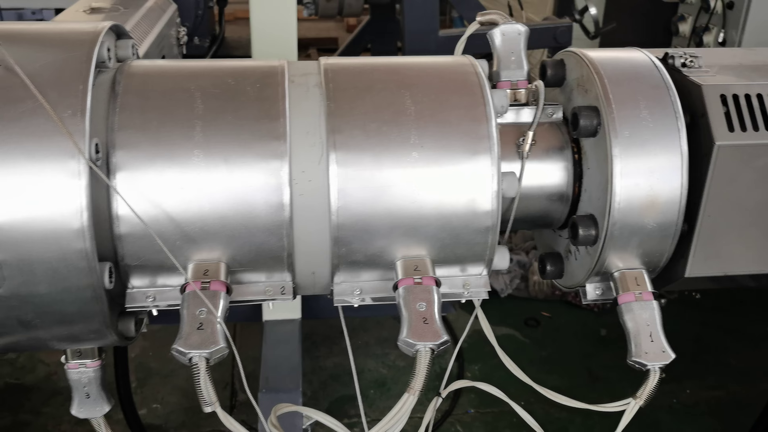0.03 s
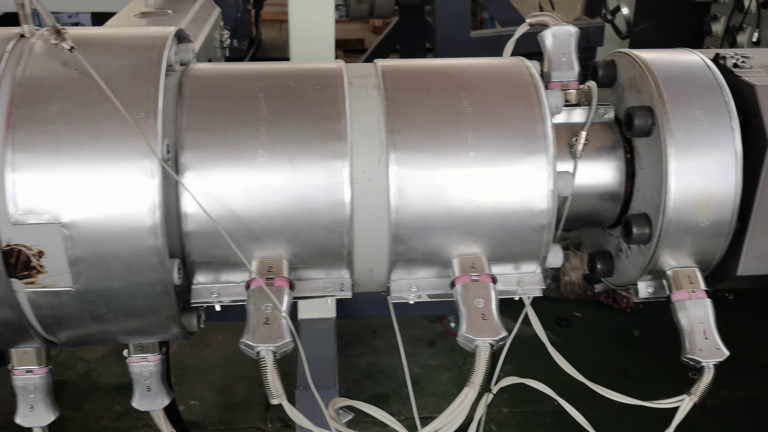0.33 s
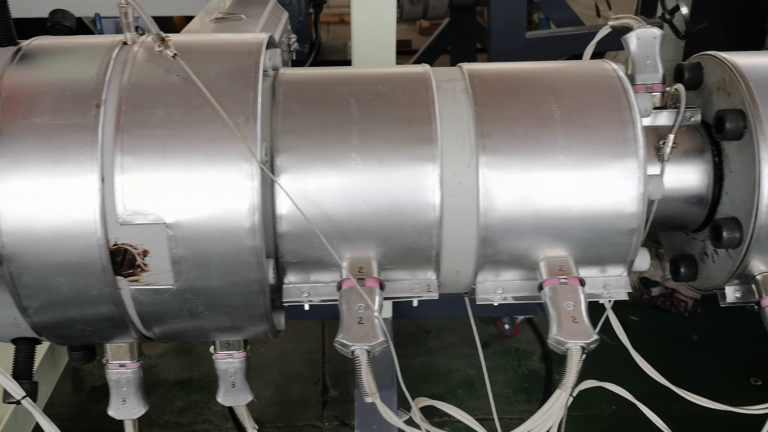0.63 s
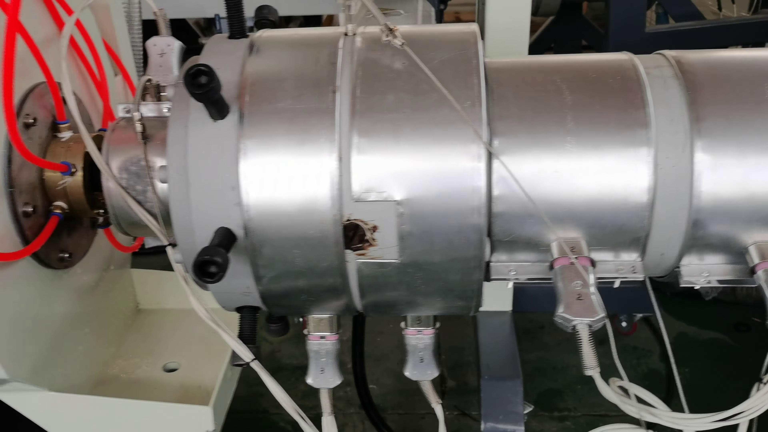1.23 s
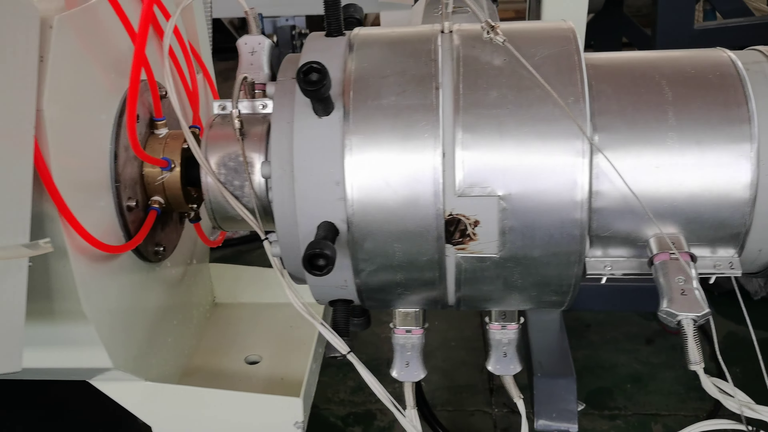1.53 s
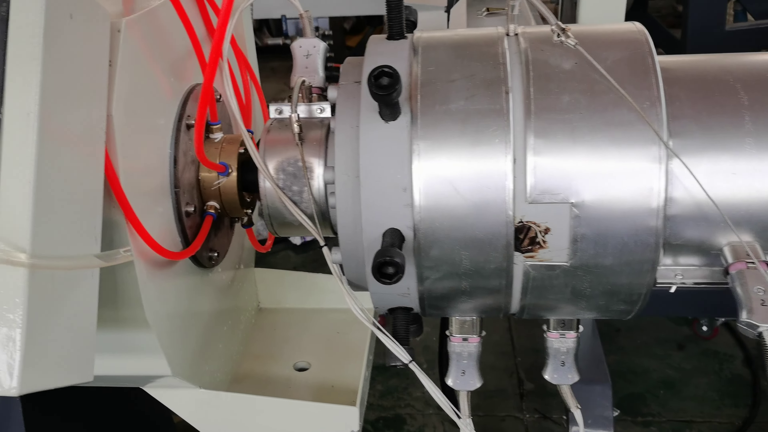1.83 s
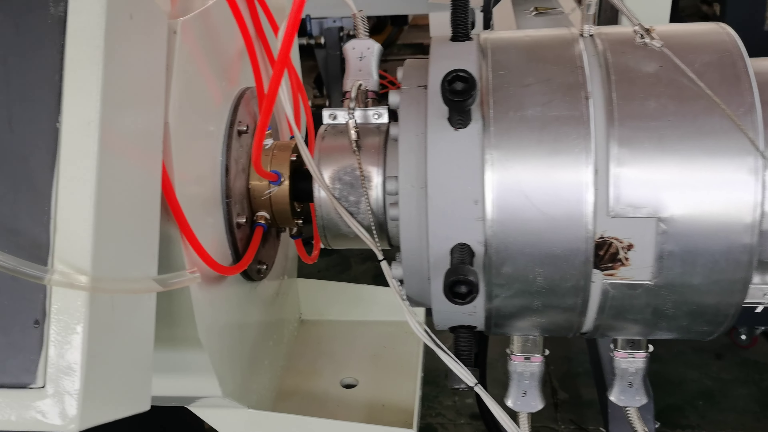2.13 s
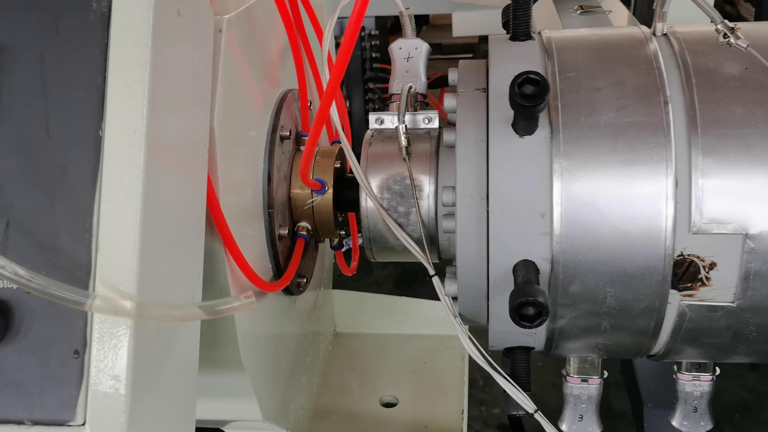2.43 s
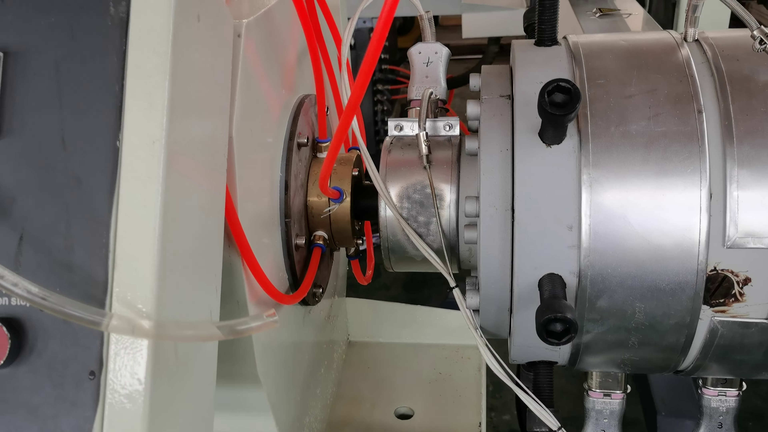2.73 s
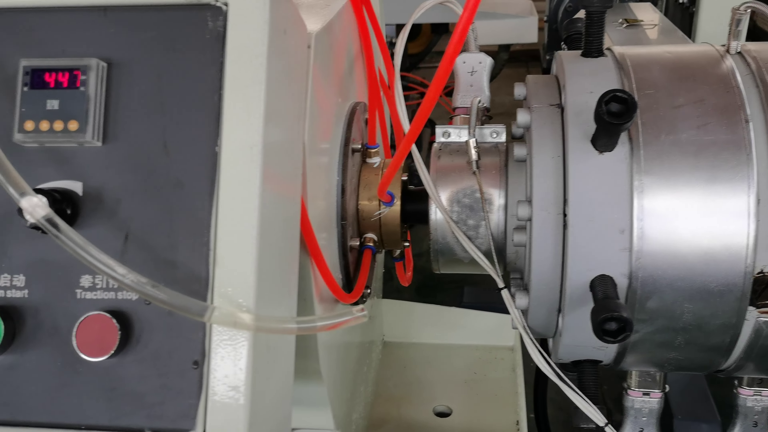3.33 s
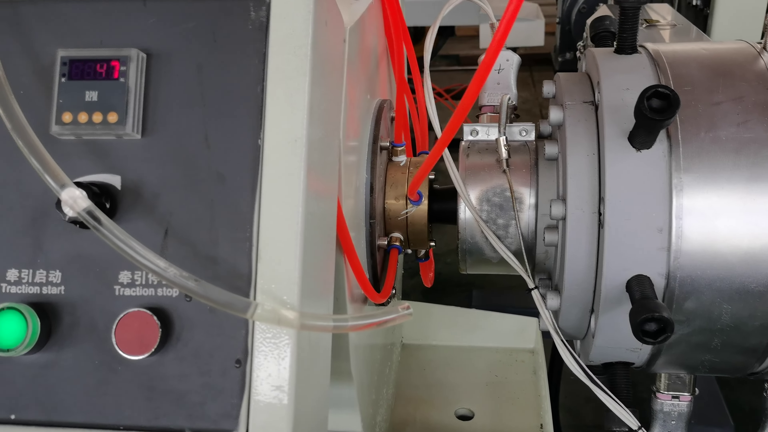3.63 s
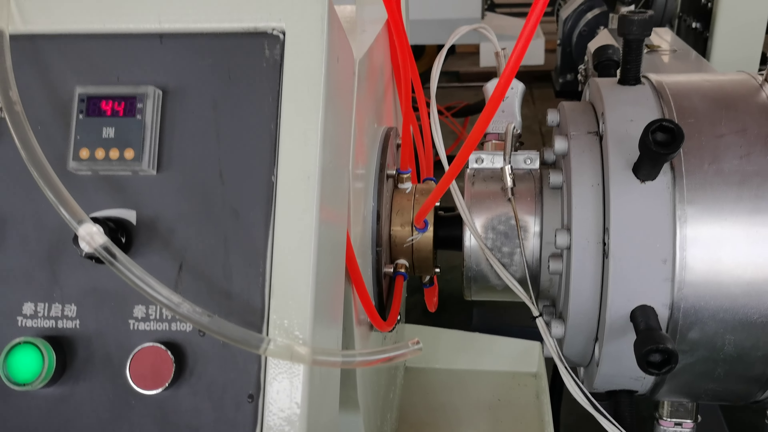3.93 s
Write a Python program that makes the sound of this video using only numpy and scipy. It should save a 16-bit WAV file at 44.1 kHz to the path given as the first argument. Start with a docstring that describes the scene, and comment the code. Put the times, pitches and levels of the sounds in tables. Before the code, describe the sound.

Steady rushing hiss and motor drone from a plastic extrusion line in a factory hall.

```python
"""In a factory hall a plastic pipe extrusion line runs steadily.
Motors, pumps and fans drone in wavering tones under a loud broadband rush of air and cooling water.
The microphone moves slowly from the extruder barrel towards the cooling tank, so the hiss grows and
changes colour. The right side is much louder, with a hollow ring near 2 kHz and a sizzle near 11 kHz."""
import sys
import numpy as np
from scipy import signal
from scipy.fft import rfft, irfft
from scipy.io import wavfile

SR = 44100
rng = np.random.default_rng(int(sys.argv[2]) if len(sys.argv) > 2 else 0)


def transcribe(u):
    """Save the signal u as a 16-bit wav file named by the first command-line argument.

    u: samples, shape (n,) or (channels, n), limited to [-1, 1]; the rate is SR.
    q: integer samples, one column per channel.
    """
    v = np.clip(np.atleast_2d(u).T, -1, 1)
    q = np.round(v * 32767).astype(np.int16)
    wavfile.write(sys.argv[1], SR, q)


N = 176400


def amp(db):
    """Amplitude ratio of a level in decibels."""
    return 10 ** (np.asarray(db) / 20)


def unit_rms(x):
    """Normalisation to a mean square of 1."""
    return x / np.sqrt(np.mean(abs(x) ** 2) + 1e-20)


def curve(points, t):
    """Linear interpolation in time."""
    return np.interp(t, *np.transpose(points))


def spectrum(rows, hz):
    """Interpolation of each column on a logarithmic frequency axis."""
    f, *columns = np.transpose(rows)
    return [np.interp(np.log(hz + 1), np.log(f), column) for column in columns]


def gaussian(x, centre, half_width):
    """Gaussian of height 1, falling to 1/e at the half width."""
    return np.exp(-((x - centre) / half_width) ** 2)


def drift(shape, spans):
    """Low-pass filtered noise of rms 1, correlated over about `spans` steps along each axis."""
    field = rng.standard_normal(shape)
    for axis, span in enumerate(spans):
        field = np.swapaxes(field, axis, -1)
        size = field.shape[-1]
        lowpass = gaussian(np.fft.rfftfreq(size), 0, 0.5 / span)
        field = np.swapaxes(irfft(rfft(field) * lowpass, size), axis, -1)
    return unit_rms(field)


def hall_tone(hz, db, left_db, unsteadiness, waver_hz=7):
    """Phasor addition: a steady plus a random part, so a tone crossing the hall wavers in level and phase."""
    t = np.arange(N) / SR
    span = SR / waver_hz / 2
    waver = unit_rms(drift((N,), [span]) + 1j * drift((N,), [span]))
    carrier = np.exp(2j * np.pi * (hz * t + rng.random()))
    wave = ((1 + unsteadiness * waver) * carrier).real
    return unit_rms(wave) * amp(db) * amp([[left_db], [0]])


def motors():
    """Periodic motion of drives, pumps and fans radiates tones, which swell as the microphone passes."""
    # the strongest tone along the hall's standing waves: t/s, rms level on the right/dB
    drone = [(0, -48), (.55, -46), (.8, -40), (1.1, -38), (1.5, -40.5), (2.2, -40), (2.8, -44),
             (3.4, -40.3), (4, -48)]
    # machine tones: f/Hz, highest rms level on the right/dB, left minus right/dB,
    # unsteadiness (0-1), loudest at t/s, swing/dB
    tones = [(35.5, -74, -7, .3, 2, 0), (54, -56, -4, 0.2, 2.5, 2), (104, -56, -2.5, 0.4, 2.5, 5.5),
             (198.2, -55.5, -1, 0.4, 2.5, 4), (247, -43, -3.5, 0.45, 1.53, 3.5),
             (494.5, -48.5, -6.5, 0.28, 2.17, 10.5), (610, -55.5, -3, 0.5, 1.7, 5)]
    t = np.arange(N) / SR
    hum = hall_tone(hz=368, db=curve(drone, t), left_db=-6, unsteadiness=0.12)
    for hz, db, left_db, unsteadiness, loudest_s, swing_db in tones:
        nearness = gaussian(t, loudest_s, half_width=1.14)
        hum += hall_tone(hz, db + swing_db * (nearness - 1), left_db, unsteadiness)
    return hum


def air_and_spray():
    """Turbulence gives random pressure, spitting water faint impulses: white noise on each side, plus impulses
    that strike both sides at the same moments, each taking the sign of that side's noise."""
    spits_per_s, spit_db, spread_db = 200, 5.5, 1.3  # levels relative to the turbulence
    turbulence = rng.standard_normal((2, N))
    onsets = rng.random(N) < spits_per_s / SR
    spits = onsets * amp(spit_db + spread_db * np.minimum(rng.exponential(1, N), 4))
    return unit_rms(turbulence + spits * np.sign(turbulence))


def left_arrival(own, right, hz, t):
    """Partial coherence and path difference: the left shares some of the right's noise and hears it first."""
    # likeness of the two sides: f/Hz, coherence (0-1)
    likeness = [(20, 0.6), (120, 0.96), (350, 0.87), (750, 0.4), (1400, 0.3), (2100, .25), (3400, 0.46),
                (5000, 0.38), (10000, 0), (16000, 0.1)]
    # earlier arrival on the left, shrinking as the microphone moves: t/s, lead/ms
    lead_ms = [(0, 0.49), (.75, .41), (1.75, 0.259), (3.75, 0.22)]
    coherence = np.clip(spectrum(likeness, hz)[0], 0, 1)
    direct = np.interp(hz, [820, 1430], [0, 1])  # lower sound fills the hall and reaches both together
    phase_lead = 2 * np.pi * hz * direct * curve(lead_ms, t) / 1000
    return (coherence * right + np.sqrt(1 - coherence ** 2) * own) * np.exp(1j * phase_lead)


def rush():
    """Source and filter: the noise of air and water takes on a spectrum that depends on where it is heard."""
    # spectrum on each side: f/Hz, spectral density level at the barrel/dB, gain at the tank/dB
    left_spectrum = [(15, -89.5, 0.6), (30, -80.3, 2.6), (55, -75.5, -3), (110, -71.3, 7), (252, -69.5, -2),
                     (480, -73.5, -0.7), (795, -83, 11.5), (1150, -78.5, 3), (1400, -76.5, 8.6),
                     (2020, -78, 4.5), (2700, -72, 9.5), (3400, -73, 5.5), (4050, -70.5, 15.5),
                     (4500, -85, -8), (5000, -71, 6.5), (6400, -77.5, -1), (6720, -80, 18),
                     (7050, -85.5, 19), (7260, -72.5, 6.5), (8550, -69.5, 11.5), (9800, -83, 16.5),
                     (10900, -82, 3.5), (11700, -71, -1), (12900, -83, -1.9), (14000, -71, 2),
                     (14500, -71.8, -0.3), (15400, -72.5, 6)]
    right_spectrum = [(15, -87.8, 0.4), (30, -79.7, 3), (55, -75, -1), (110, -67.5, 1), (206, -66, 0.5),
                      (265, -61, -1), (466, -70.5, 5), (735, -71.5, 3.5), (1180, -68.5, 1.6),
                      (1867, -59.5, 5), (2014, -49, -0.7), (2192, -52.5, 3.5), (2380, -57.5, 3.2),
                      (2660, -59, 5), (2710, -59, 1.3), (3530, -59, 0), (4630, -64.5, 3.1),
                      (4880, -59.5, 2.5), (5380, -76.5, -4), (6520, -70.5, 5.5), (6600, -86, -3),
                      (7020, -86.7, 20), (7860, -67.5, 8.5), (8930, -69, 0.5), (9720, -59, 1),
                      (10140, -51.5, -6.5), (10900, -52.5, -5), (11580, -49.5, -2.5), (12320, -63.5, 5),
                      (14400, -67.5, 4.5), (15600, -67.2, 0)]
    # way from the barrel to the tank: t/s, share (0-1)
    approach = [(0, 0), (.8, 0.07), (1.5, 0.23), (2.2, 0.62), (2.7, 0.82), (3.1, 0.88), (3.5, 0.85),
                (3.85, 0.77), (4, 0.9)]
    # rise and fall of the treble: t/s, level/dB
    treble = [(0, 0.5), (.25, 0.9), (.6, -0.5), (1.05, -1), (1.65, -1), (2, 0.4), (2.7, 0.8), (3.2, 0.7),
              (3.55, 0.3), (3.85, 4), (4, 0)]
    # bands that swell or fade in passing: t/s, half length/s, f/Hz, half width/Hz, left/dB, right/dB
    swells = [(0.202, .3, 15100, 900, 5, 3), (.2, 0.86, 4686, 222, 5, 10.5),
              (0.222, 0.2, 10170, 400, 8, 3.5), (.3, 0.56, 5300, 150, -8, 2),
              (.55, 0.17, 11770, 200, 9, 2.5), (.85, 0.4, 7060, 250, -12, -10),
              (0.994, 0.37, 5760, 130, 12, -3), (1.055, 0.35, 10250, 220, -6, 7),
              (1.048, 0.47, 4950, 130, 13, 1), (1.22, .3, 15200, 700, -10, -3),
              (1.29, .2, 7640, 300, 18.5, -2), (1.3, 0.64, 970, 80, 2.5, 4.5),
              (1.4, 0.61, 2550, 250, 5, 3.5), (1.546, 0.39, 4020, 200, 9.5, -4),
              (1.55, .3, 14600, 900, 0, -2.5), (1.9, 0.53, 10000, 350, -2, -3),
              (1.95, 0.53, 4450, 150, -16, -5.5), (2, 0.65, 7280, 170, 10, 0),
              (2.198, 0.28, 8800, 300, 3.5, -4), (2.3, 0.82, 99, 30, 0, -1), (2.5, 0.6, 13500, 130, 0, 6),
              (2.6, .55, 8170, 150, -20, -14), (2.752, .35, 12230, 200, 11, -6),
              (2.795, 0.65, 2140, 110, -3, 4), (3.7, 0.63, 9760, 130, -9, 5.5), (3.7, 1, 5330, 220, 14, -9),
              (3.8, 0.42, 1440, 161, 4, 5), (3.8, .4, 12300, 130, 0, 4), (3.9, .3, 13000, 400, 11, 0)]
    # narrow resonances on the right: f/Hz, half width/Hz, gain/dB
    rings = [(2080, 38, 2.5), (2160, 13, 13), (10500, 78, 3.5), (10600, 150, -0.5), (11520, 110, 3),
             (4260, 90, -0.5)]
    frame, hop = 2048, 512
    flicker_db, flicker_s = 0.12, 0.04
    colour_db, colour_s, colour_hz = (2.4, 1.5), 1.1, 130  # drifting colour from nearby metal (left, right)
    hz, t, bands = signal.stft(air_and_spray(), SR, nperseg=frame, noverlap=frame - hop)
    hz = hz[:, None]
    bands[0] = left_arrival(bands[0], bands[1], hz, t)
    treble_share = np.interp(hz, [3500, 12100], [0, 1])
    flicker = drift(t.shape, [flicker_s * SR / hop])
    treble_db = treble_share * (curve(treble, t) + flicker_db * flicker)
    for side, table in enumerate([left_spectrum, right_spectrum]):
        barrel_db, tank_gain_db = spectrum(table, hz)
        db = barrel_db + tank_gain_db * curve(approach, t) + treble_db
        for at_s, half_s, f, half_hz, *gain_db in swells:
            db += gain_db[side] * gaussian(t, at_s, half_s) * gaussian(hz, f, half_hz)
        if side == 1:
            db += sum(ring_db * gaussian(hz, f, half_hz) for f, half_hz, ring_db in rings)
        colour = drift(db.shape, [colour_hz * frame / SR, colour_s * SR / hop])
        db += colour_db[side] * hz / (hz + 1500) * colour  # weaker in the bass
        bands[side] *= amp(db)
    _, hiss = signal.istft(bands, nperseg=frame, noverlap=frame - hop)
    return np.sqrt(SR / 2) * hiss[:, :N]  # white noise spreads its power over SR / 2 hertz


def scene():
    """Superposition of the rush and the machine tones."""
    return rush() + motors()


def record(dry):
    """Band limiting by a steep linear-phase low-pass filter."""
    cutoff_hz = 15830
    lowpass = signal.firwin(701, cutoff_hz, window=("kaiser", 9), fs=SR)
    return signal.oaconvolve(dry, lowpass[None], "same")


dry = scene()
out = record(dry)
transcribe(out)
```